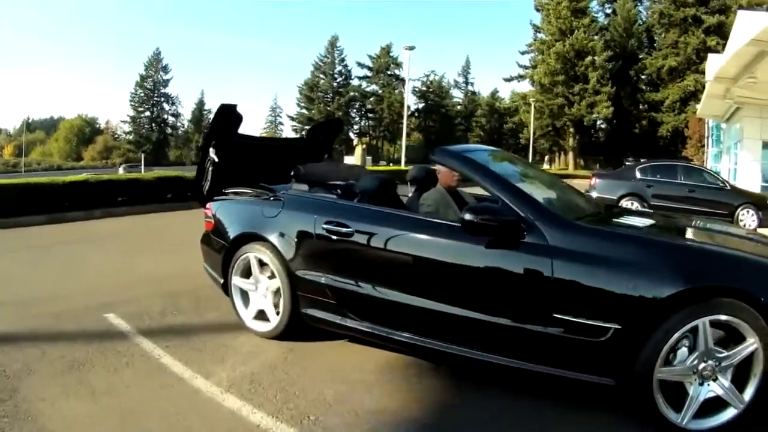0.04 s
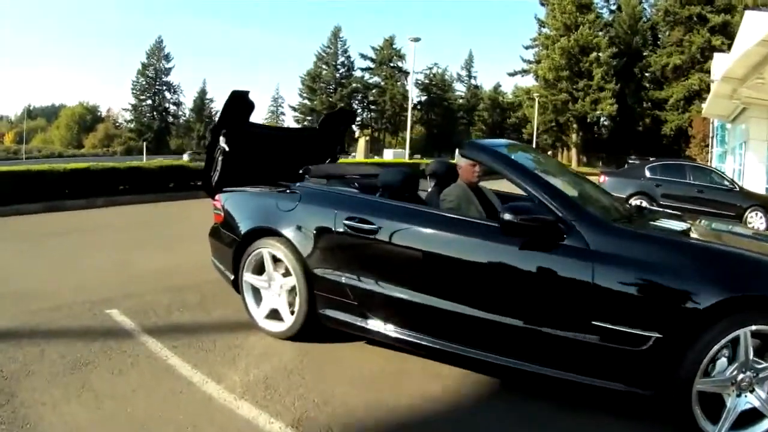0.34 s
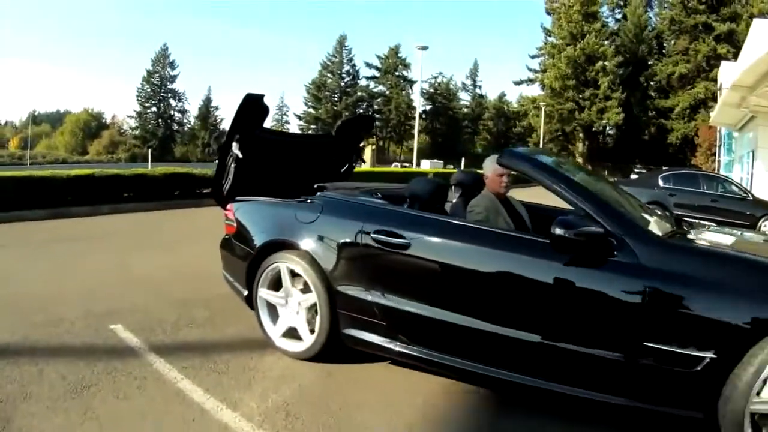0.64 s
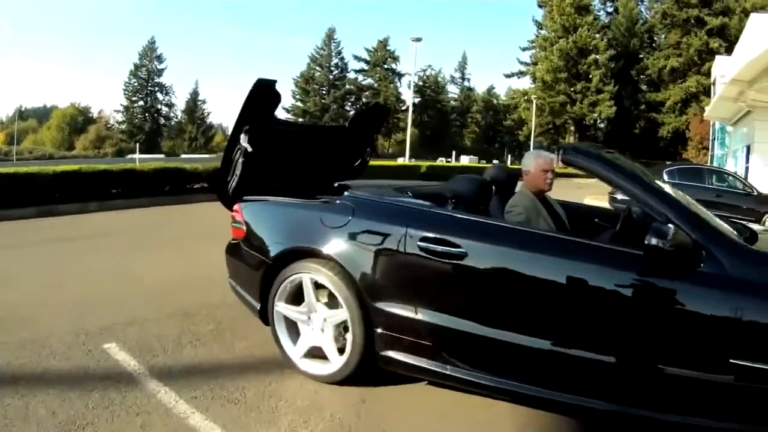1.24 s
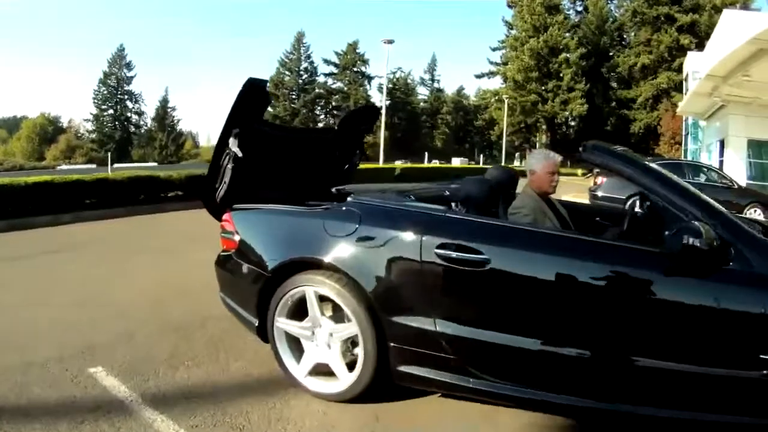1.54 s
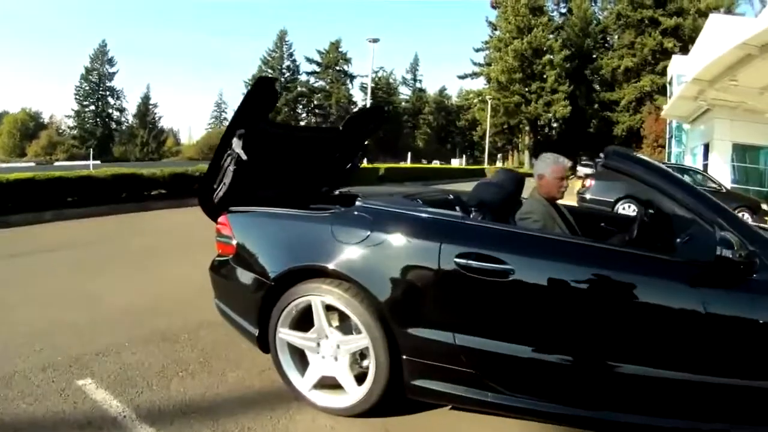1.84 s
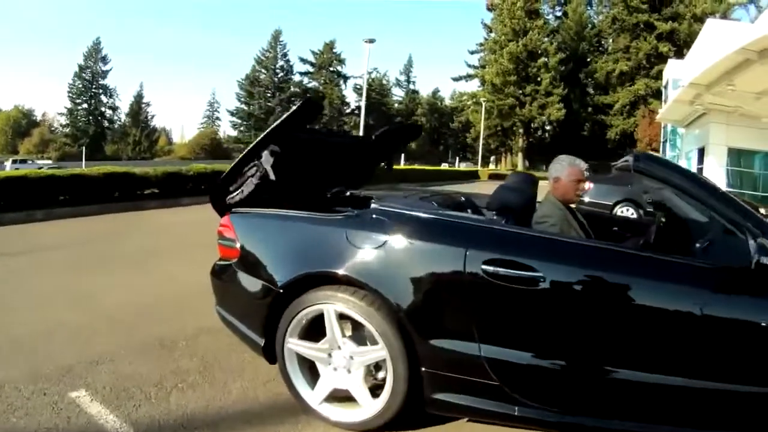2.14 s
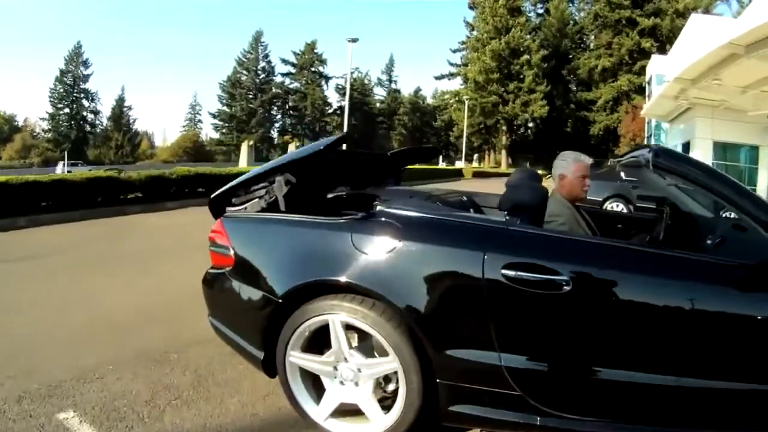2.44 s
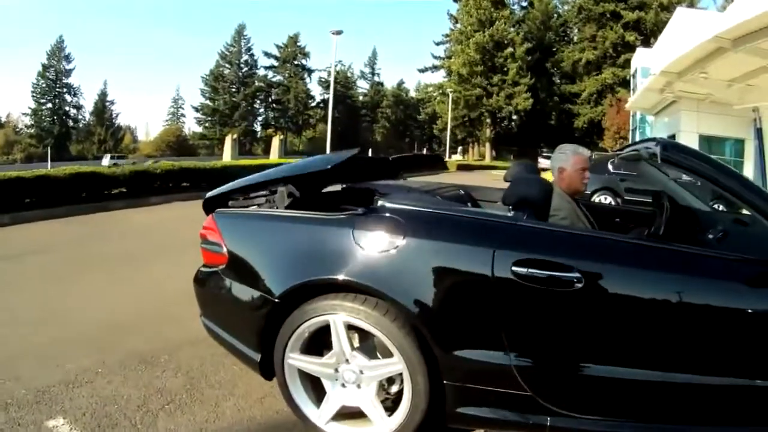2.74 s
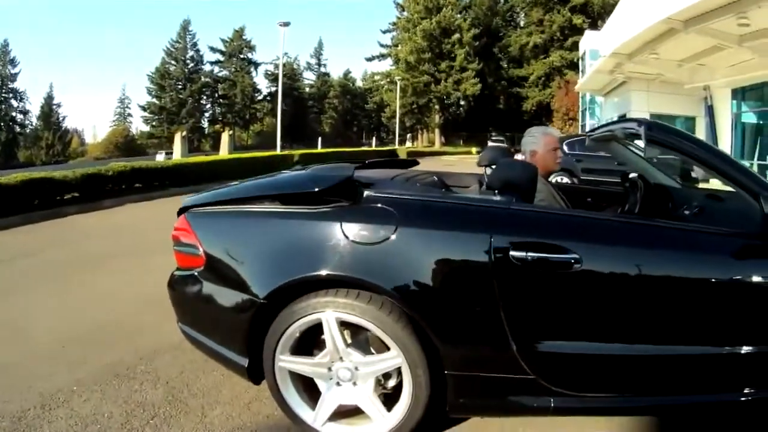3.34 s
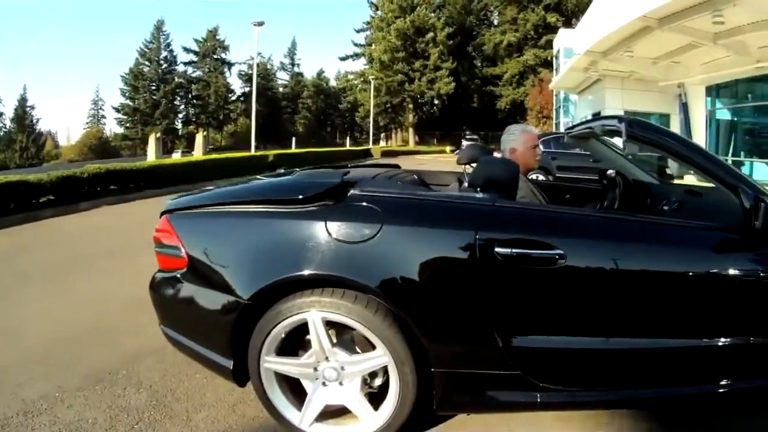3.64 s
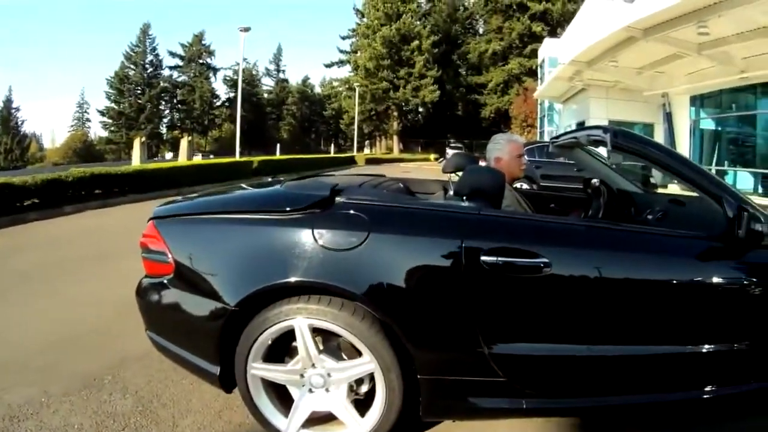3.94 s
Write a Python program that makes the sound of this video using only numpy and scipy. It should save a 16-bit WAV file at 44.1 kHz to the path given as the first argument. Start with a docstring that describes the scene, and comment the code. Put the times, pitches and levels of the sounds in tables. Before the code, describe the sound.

A car engine idles with a low throb as its powered lid hisses and clacks shut.

```python
"""The throb of an idling eight-cylinder convertible is heard over a low rumble and a wash of far traffic.
Its exhaust pulses form a stack of tones that grows louder as a pocket camera is carried toward the tail,
and sags in pitch under load. The powered rear lid folds shut with a hydraulic hiss and lands with a faint
clack. The camera holds each sample at a low rate, which mirrors a fizz into the treble."""
import sys
import numpy as np
from scipy import signal
from scipy.fft import rfft, irfft
from scipy.io import wavfile

SR = 44100
rng = np.random.default_rng(int(sys.argv[2]) if len(sys.argv) > 2 else 0)


def transcribe(u):
    """Save the signal u as a 16-bit wav file named by the first command-line argument.

    u: samples, shape (n,) or (channels, n), limited to [-1, 1]; the rate is SR.
    q: integer samples, one column per channel.
    """
    v = np.clip(np.atleast_2d(u).T, -1, 1)
    q = np.round(v * 32767).astype(np.int16)
    wavfile.write(sys.argv[1], SR, q)


N = 176400

# firing rate of the engine, sagging under load: t/s, f/Hz
FIRING_RATE = [(0, 40.0), (.5, 40.4), (2, 40.45), (2.5, 40.2), (3, 39.95), (3.5, 39.3), (4, 38.65)]
WAVER_HZ = 6  # bandwidth of the level wander in the engine's tones


def amp(db):
    """Amplitude ratio of a level: a factor of ten for every 20 dB."""
    return 10 ** (np.asarray(db) / 20)


def unit(x):
    """Normalisation to rms 1."""
    return x / np.sqrt(np.mean(x ** 2) + 1e-20)


def curve(points):
    """Linear interpolation between (t/s, value) points."""
    return np.interp(np.arange(N) / SR, *np.transpose(points))


def colour(x, points):
    """Zero-phase filtering by (f/Hz, gain/dB) points joined on a logarithmic frequency axis."""
    hz, db = np.transpose(points)
    f = np.fft.rfftfreq(len(x), 1 / SR)
    gain = amp(np.interp(np.log(f + 1), np.log(hz + 1), db))
    return irfft(rfft(x) * gain, len(x))


def noise(spectrum):
    """Spectral shaping of white noise, scaled to rms 1: only the spectrum's relative levels count."""
    return unit(colour(rng.standard_normal(N), spectrum))


def drift(rate_hz):
    """Low-pass filtered noise: a slow random fluctuation of rms 1."""
    f = np.fft.rfftfreq(N, 1 / SR)
    low_pass = (f > 0) / (1 + (f / rate_hz) ** 4)
    return unit(irfft(rfft(rng.standard_normal(N)) * low_pass, N))


def traffic():
    """Incoherent tyre noise merges into a far wash; one leaving car's tread sings near a kilohertz."""
    wash_spectrum = [(150, -8.5), (400, -4), (620, 0), (1000, 0.5), (1500, -4.5), (2100, -11.5),
                     (2900, -15), (3700, -20.5), (4800, -22.5), (6000, -27.5)]  # far tyres: f/Hz, level/dB
    wash_level = [(0, -29.5), (.9, -30), (1.6, -30.5), (2.6, -30.5), (4, -31.5)]  # t/s, level/dB
    tread_spectrum = [(600, -34), (880, -4.5), (1020, -2), (1180, -8), (1700, -25), (4000, -60)]  # tread of the passing car: f/Hz, level/dB
    tread_level = [(0, -42.5), (.9, -38), (1.5, -48), (4, -55)]  # t/s, level/dB
    wash = amp(curve(wash_level) + 0.56 * drift(rate_hz=21)) * noise(wash_spectrum)
    return wash + amp(curve(tread_level)) * noise(tread_spectrum)


def rumble(fan_hz=43, fan_db=-31):
    """Forced vibration: the radiator fan's shake adds a wavering tone to the low noise of car and air."""
    spectrum = [(5, -32), (15, -14), (25, -19), (45, -6), (55, -6), (76, -0.5), (100, -4.5), (135, -5.5),
                (210, -8.5), (300, -19), (500, -31.5), (1000, -58)]  # noise of car and air: f/Hz, level/dB
    level = [(0, -28), (.55, -28), (.75, -25), (1.3, -24.5), (1.6, -25), (2.2, -30), (3, -24.5),
             (3.5, -22.5), (4, -24.5)]  # t/s, level/dB
    fan_turns = np.cumsum(fan_hz + 0.44 * drift(rate_hz=3.5)) / SR
    fan = np.sqrt(2) * np.sin(2 * np.pi * fan_turns)
    return amp(curve(level)) * noise(spectrum) + amp(fan_db + 0.68 * drift(rate_hz=5)) * fan


def camera_bumps(pitch_hz=86, width_s=0.0032):
    """Structure-borne sound: each push on the carried camera is a low tone burst in a Gaussian envelope."""
    pushes = [(0.14, -8.5), (.359, -15)]  # dull bumps: t/s, peak level/dB
    out = np.zeros(N)
    for centre, db in pushes:
        t = np.arange(N) / SR - centre
        out -= amp(db) * np.exp(-(t / width_s) ** 2 / 2) * np.cos(2 * np.pi * pitch_hz * t)
    return out


def hiss():
    """Flow noise: exhaust and hydraulics hiss with a slight flutter; oil rushes through the lid's valves."""
    hiss_spectrum = [(400, -0.5), (800, 8), (1600, 8), (2800, -1), (3700, -7.5), (4700, -6.5), (6000, -13)]  # exhaust and hydraulics: f/Hz, level/dB
    hiss_level = [(0, -43), (.5, -39), (1.1, -56), (2, -43), (2.8, -37), (3.5, -35.5), (4, -34.5)]  # t/s, level/dB
    valve_spectrum = [(1100, -42), (1450, -8), (1620, 1.5), (1850, -8), (2400, -19), (2900, -6.5),
                      (3300, -10.5), (3800, -25)]  # oil in the valves: f/Hz, level/dB
    valve_level = [(0, -58), (2, -52), (2.9, -44), (3.4, -42), (4, -41)]  # t/s, level/dB
    broadband = amp(curve(hiss_level) + 1.03 * drift(rate_hz=15)) * noise(hiss_spectrum)
    return broadband + amp(curve(valve_level)) * noise(valve_spectrum)


def belt_whine(order=14.35):
    """A belt-driven part turns in step with the engine, so its tone is a multiple of the firing rate."""
    level = [(0, -55), (3.2, -52), (3.6, -40.5), (4, -40.5)]  # the whine emerges as the lid comes down: t/s, level/dB
    turns = np.cumsum(order * curve(FIRING_RATE)) / SR
    return np.sqrt(2) * amp(curve(level) + drift(WAVER_HZ)) * np.sin(2 * np.pi * turns)


def lid_clacks():
    """Impact excitation: each contact gives a tick of noise and sets the panel's damped modes ringing."""
    # the lid lands and its latch takes hold: t/s, ring level/dB, tick level/dB, tick time constant/s
    contacts = [(3.677, -13.5, -20.5, .003), (3.686, -19, -29, .004), (3.869, -31, -29.5, 0.022),
                (3.988, -26, -37, .004)]
    modes = [(350.5, -5, 0.089), (407, -6.5, .09), (596, -4.5, .05), (884, -12, 0.041), (1092, -3.5, 0.04),
             (1350, -13, 0.021)]  # modes of the panel: f/Hz, relative level/dB, T60/s
    tick_spectrum = [(300, -8), (1200, -5), (2500, -3), (4200, -0.5), (6000, 1.5)]  # contact noise: f/Hz, level/dB
    out = np.zeros(N)
    for start, ring_db, tick_db, tick_s in contacts:
        t = np.maximum(np.arange(N) / SR - start, 0)
        ring = sum(amp(db - 60 * t / t60) * np.sin(2 * np.pi * hz * t) * rng.choice([-1, 1])
                   for hz, db, t60 in modes)
        tick = (t > 0) * np.exp(-t / tick_s) * noise(tick_spectrum)
        out += amp(ring_db) * ring + amp(tick_db) * tick
    return out


def exhaust():
    """Periodic firings give a line spectrum, dispersed in phase by the pipes, and pulsing puffs of gas."""
    nearness = [(0, -10.5), (1.3, -18.5), (2.2, -3.5), (2.7, -2.5), (3.3, -2.5), (4, -0.5)]  # nearness of the tailpipes: t/s, level/dB
    # steady orders: multiple of the firing rate, level/dB at 0 dB nearness, dB gained per dB of nearness
    orders = [(1.5, -36.5, 2), (2, -32, 0.2), (2.5, -29.5, 1.2), (3, -36.5, 0), (4.5, -37, 1.2),
              (6, -27, 1.97), (6.5, -39, 2), (7, -42, .9), (8, -37.5, 1.6), (10, -51.5, -0.2)]
    # three orders that swell and fade along the walk: t/s, level/dB
    fourth = [(0, -37.5), (1.4, -39), (1.75, -23.5), (2.3, -31.5), (2.7, -25.5), (3.4, -25), (4, -24.5)]
    fifth = [(0, -36), (.7, -32.5), (1.3, -37), (1.65, -28.5), (2.05, -31), (2.35, -36.5), (3, -26.5),
             (3.5, -23), (4, -21)]
    ninth = [(0, -68), (2.1, -55), (2.4, -34), (3.1, -33.5), (3.5, -45.5), (4, -32.5)]
    puff_spectrum = [(60, -14), (110, -16.5), (170, -2.5), (220, 7), (280, -6), (400, -9.5), (520, -29),
                     (900, -41)]  # gas leaving the pipes: f/Hz, level/dB
    travel_s, jitter_cycles, waver_db = 0.019, 0.007, 1.4
    dispersion_rad, resonant_order = 0.386, 5.09
    puff_db, puff_depth = -29, 0.38

    firing_hz = curve(FIRING_RATE)
    cycles = np.cumsum(firing_hz) / SR - travel_s * firing_hz
    phase = 2 * np.pi * (cycles + jitter_cycles * drift(rate_hz=14))
    near_db = curve(nearness)
    tones = [(order, db + growth * near_db) for order, db, growth in orders]
    tones += [(4, curve(fourth)), (5, curve(fifth)), (9, curve(ninth))]
    pulses = np.zeros(N)
    for order, db in tones:
        lag = dispersion_rad * (order - resonant_order) ** 2  # smears each pulse about the pipe resonance
        pulses += np.sqrt(2) * amp(db + waver_db * drift(WAVER_HZ)) * np.cos(order * phase - lag)
    puffs = unit(noise(puff_spectrum) * (1 + puff_depth * np.cos(phase)))
    return pulses + amp(puff_db + near_db) * puffs


def scene():
    """Superposition: the pressures of all sources add at one microphone."""
    return (exhaust() + belt_whine() + rumble() + traffic() + hiss() + lid_clacks() + camera_bumps())[None]


def record(dry):
    """Zero-order hold: the camera's stepped samples mirror the spectrum about half the sampling rate."""
    input_filter = [(4600, 0), (5200, -1), (5600, -5.5), (5900, -16.5), (6000, -15)]  # low-pass ahead of the sampler: f/Hz, gain/dB
    hold_hz, band_edge_hz, self_noise_db = 12000, 15300, -57
    padded = np.pad(dry[0], SR, mode="reflect")
    samples = signal.resample(colour(padded, input_filter), round(len(padded) * hold_hz / SR))
    steps = signal.resample(np.repeat(samples, 16), len(padded))
    noisy = steps + amp(self_noise_db) * rng.standard_normal(len(padded))
    band_limit = signal.firwin(1023, band_edge_hz, window=("kaiser", 9), fs=SR)
    return signal.oaconvolve(noisy, band_limit, "same")[None, SR:-SR]


dry = scene()
out = record(dry)
transcribe(out)
```